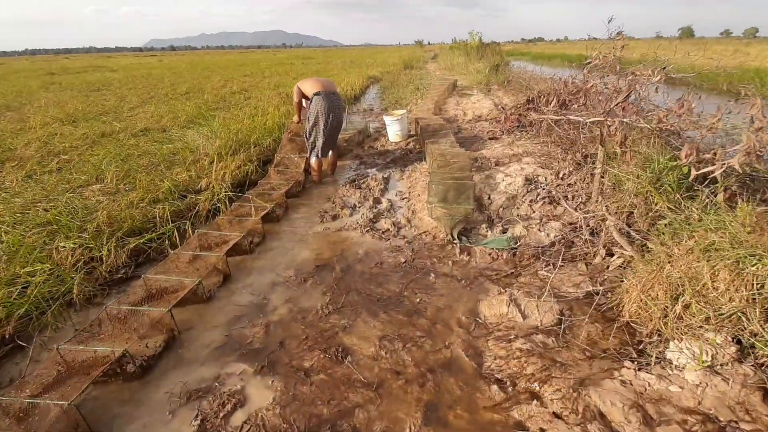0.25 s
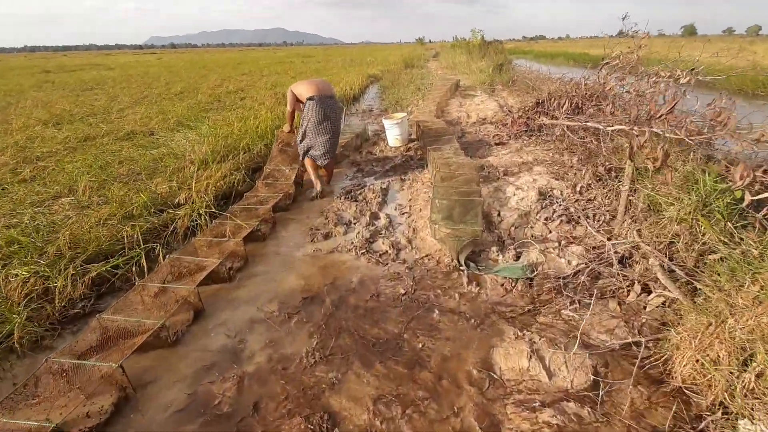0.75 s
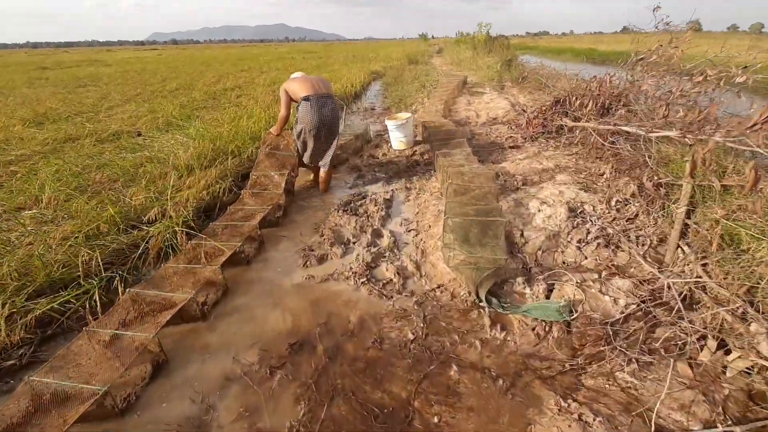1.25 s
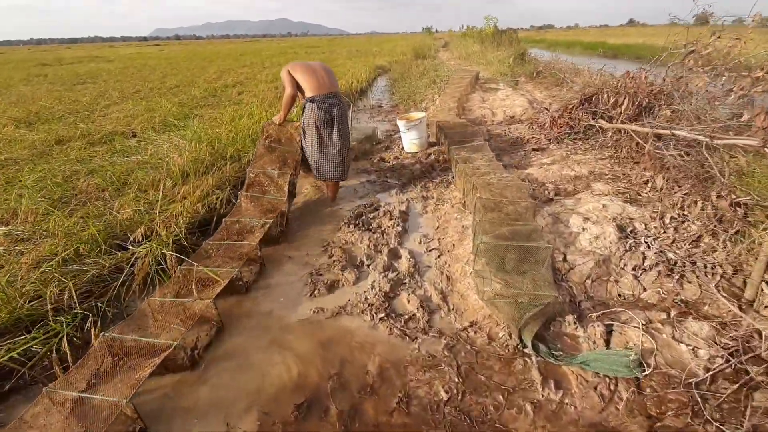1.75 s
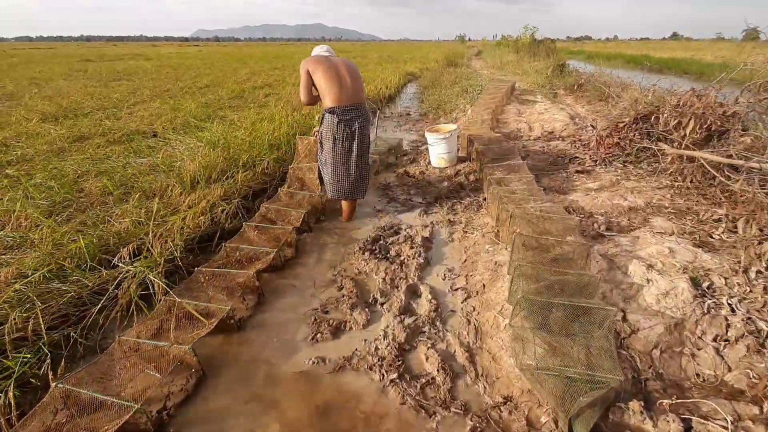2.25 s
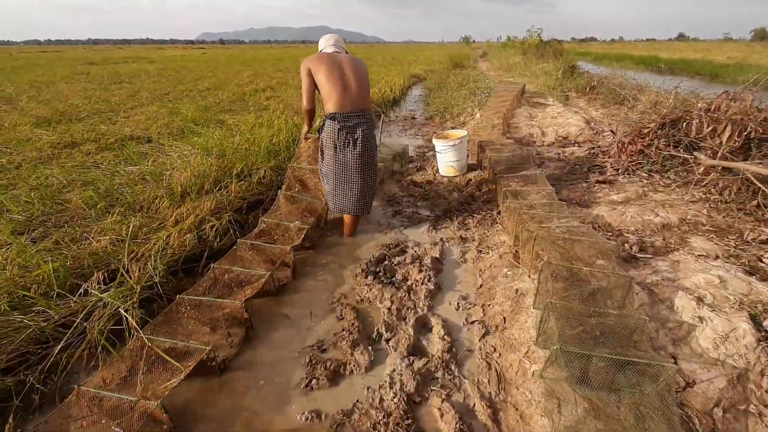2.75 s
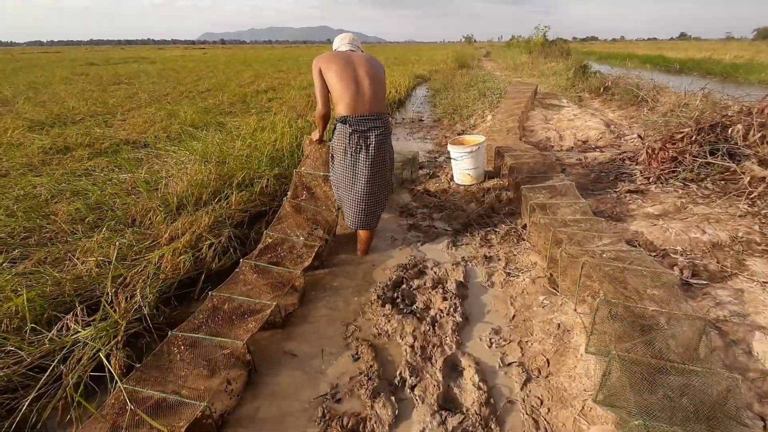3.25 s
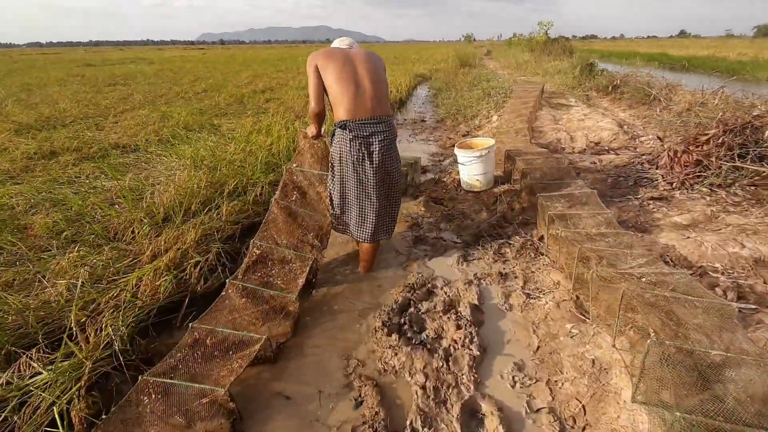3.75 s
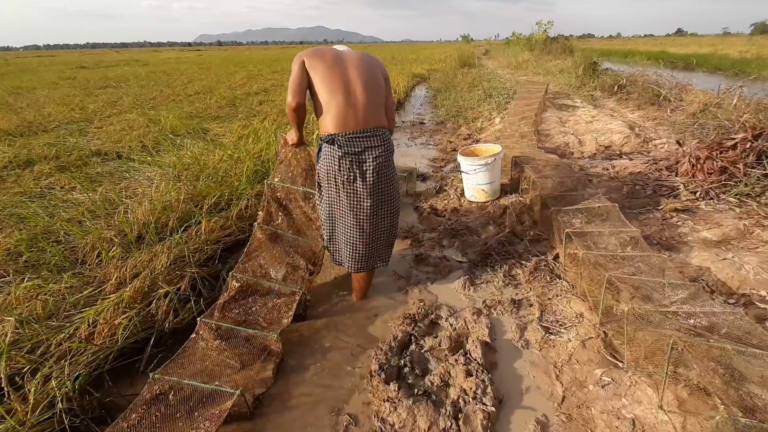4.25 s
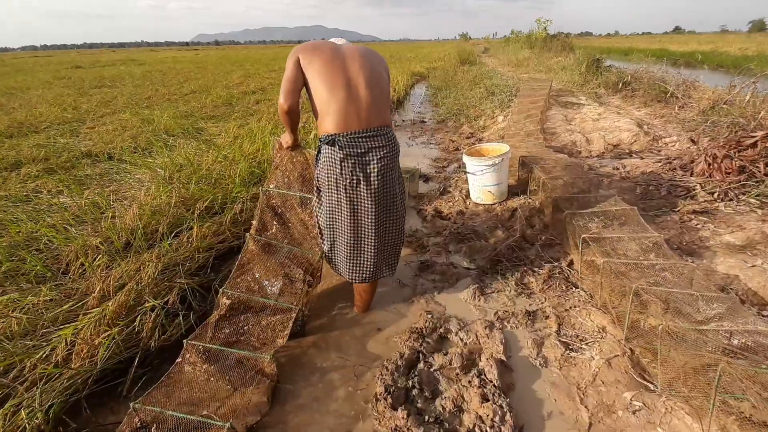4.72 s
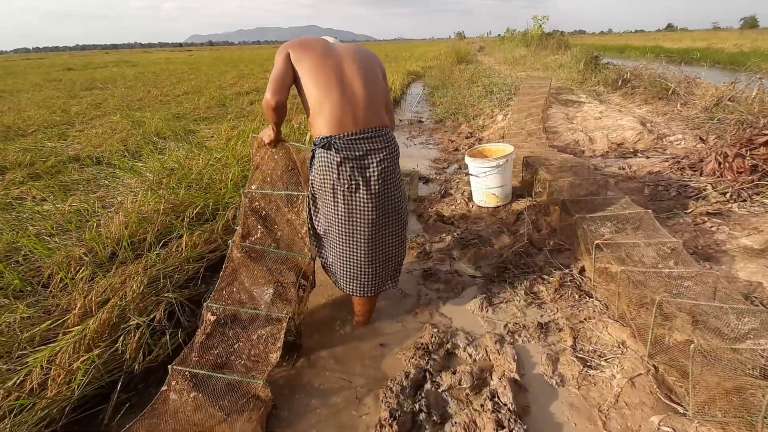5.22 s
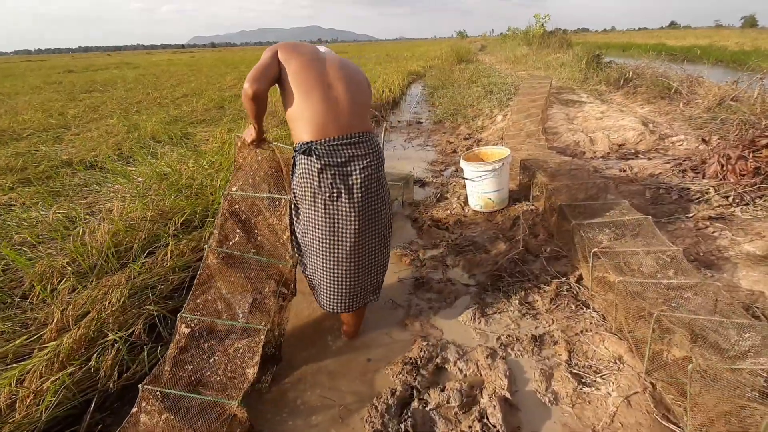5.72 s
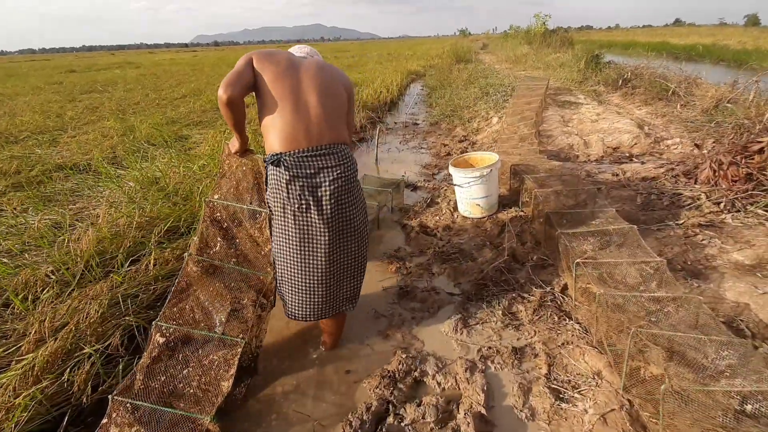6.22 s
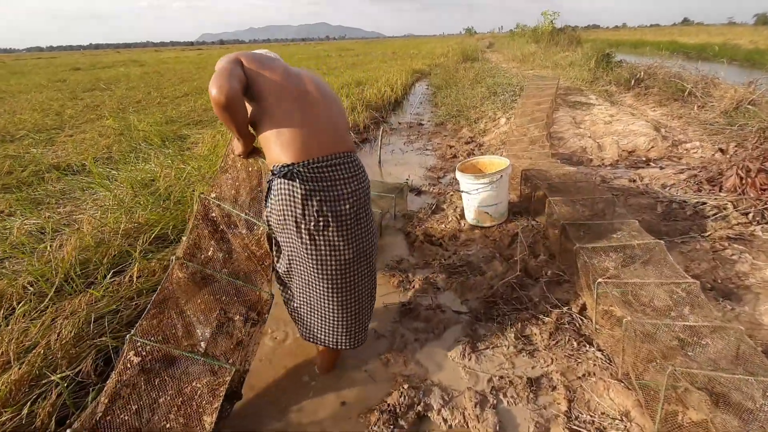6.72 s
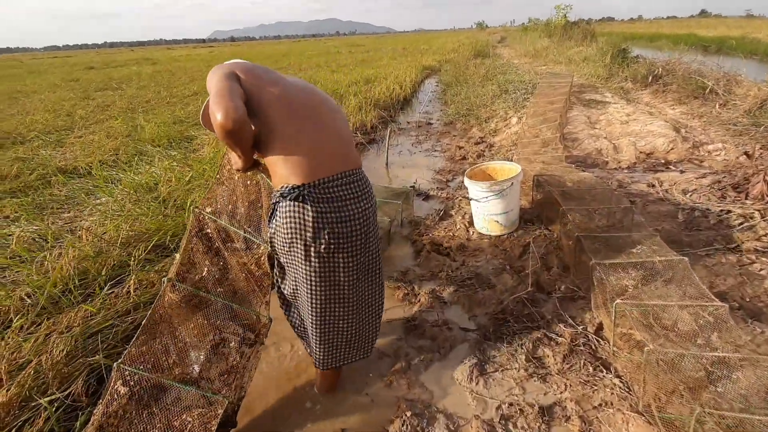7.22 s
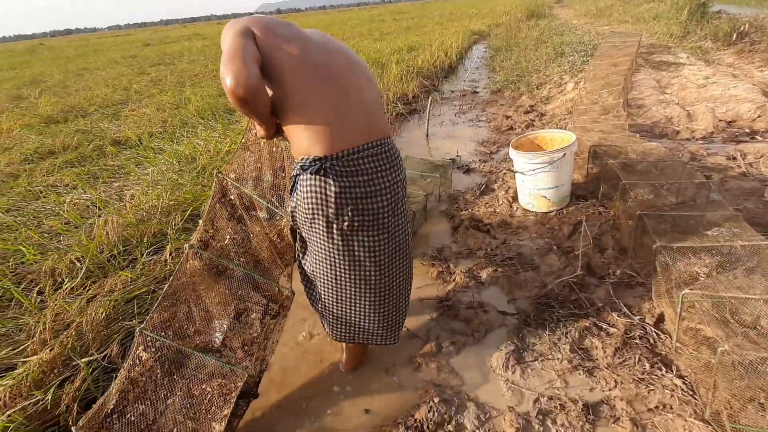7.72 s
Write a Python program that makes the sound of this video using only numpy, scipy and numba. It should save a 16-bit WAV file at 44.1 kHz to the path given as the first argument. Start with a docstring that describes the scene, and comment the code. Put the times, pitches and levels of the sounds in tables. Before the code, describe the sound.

Irregular watery sloshes, small slaps and bubbly plops from muddy wading, with low wind buffeting and a faint steady hiss beneath.

```python
"""In a shallow muddy ditch, feet wade a few metres from a small two-port camera held in a breeze.
Water sounds are damped bubble tones, patchy noise washes of gurgle, splash and spray, and short noise slaps.
Wind is low turbulence that buffets each port on its own: rumble, flutter and single thumps.
A faint hiss lies beneath; resonances of the case colour water and hiss, and a low-pass cuts the top."""
import sys
import numpy as np
from scipy import signal
from scipy.fft import rfft, irfft, next_fast_len
from scipy.io import wavfile
from scipy.ndimage import uniform_filter1d
from numba import njit

SR = 44100
rng = np.random.default_rng(int(sys.argv[2]) if len(sys.argv) > 2 else 0)


def wav_record(signal):
    """Record a signal, one row per channel, as 16-bit PCM in the file named by sys.argv[1]."""
    frames = np.transpose(np.atleast_2d(signal))
    bounded = np.clip(frames, -1, 1)
    # unit amplitude maps onto the largest positive 16-bit level
    quanta = np.round(bounded * 32767).astype(np.int16)
    wavfile.write(sys.argv[1], SR, quanta)


N = 351653

# relative spectrum of churned and slapped water: (frequency [Hz], level [dB])
WATER_SPECTRUM = [(300, 5), (550, -6), (1000, -4.5), (2000, 0), (4000, 2), (7500, -3.5), (8800, -13),
                  (10500, -6), (12600, -1), (15500, -4.5)]
LEAD = 4  # samples by which the left port hears the water first


def undb(db):
    """Decibel law: amplitude gain of a level in dB."""
    return 10 ** (np.asarray(db) / 20)


def level(x, db):
    """Mean-square energy: scale a signal to an rms level in dB."""
    return x * undb(db) / np.sqrt(np.mean(x ** 2))


def curves(table):
    """Linear interpolation: columns of a table joined by straight lines in time."""
    s, *columns = np.transpose(table)
    return [np.interp(np.arange(N) / SR, s, column) for column in columns]


def colour(x, points):
    """Spectral shaping: weight each frequency by (Hz, dB) points joined on a log-frequency axis."""
    point_hz, point_db = np.transpose(points)
    size = next_fast_len(N)
    hz = np.maximum(np.arange(size // 2 + 1) * SR / size, 1)
    gain = undb(np.interp(np.log(hz), np.log(point_hz), point_db))
    return irfft(rfft(x, size) * gain, size)[..., :N]


def band(x, lo_hz, hi_hz):
    """Band limitation: a Butterworth band-pass."""
    return signal.sosfilt(signal.butter(3, [lo_hz, hi_hz], "bandpass", fs=SR, output="sos"), x)


def walk(rate_hz):
    """Random modulation: levels held for 1 / rate_hz seconds and smoothed twice; spread near 1."""
    hold = int(SR / rate_hz)
    steps = np.repeat(rng.standard_normal(N // hold + 1), hold)
    return 1.21 * uniform_filter1d(uniform_filter1d(steps, hold), hold)[:N]


def heap(floor_db, crest, peak_db, rise_s, fall_s, edge_db, power):
    """Incoherent power sum: gain of a floor plus humps, edge_db under their crest at rise_s and fall_s."""
    t = np.arange(0, N, 64) / SR  # coarse grid, interpolated at the end
    hump_power = 0
    humps = np.broadcast(crest, peak_db, np.maximum(rise_s, .01), np.maximum(fall_s, .01))
    for at, db, rise, fall in humps:
        distance = np.abs(t - at) / np.where(t < at, rise, fall)
        hump_power = hump_power + undb(db - edge_db * distance ** power) ** 2
    return np.sqrt(np.interp(np.arange(N) / SR, t, hump_power) + undb(floor_db) ** 2)


@njit
def ring(n, s, hz, t60, rise, glide, left, right, lag):
    """Damped oscillation: tones swell over rise cycles and glide by a share; right lags by lag samples."""
    out = np.zeros((2, n + 20000))
    for g in range(len(s)):
        start = int(s[g] * SR)
        length = min(int(t60[g] * SR), 19000)
        fade = np.exp(-np.log(1000.) / (t60[g] * SR))  # 60 dB down after t60 seconds
        size, phase = 1., 0.
        for i in range(length):
            v = size * min(phase / (2 * np.pi * rise), 1.) * np.sin(phase)
            out[0, start + i] += left[g] * v
            out[1, start + i + int(lag[g])] += right[g] * v
            phase += 2 * np.pi * hz[g] * (1 + glide * i / length) / SR
            size *= fade
    return out[:, :n]


def eddies(spectrum, lo_hz, hi_hz, lump_db, lump_hz, bed_db, count):
    """Turbulence: brief eddies strike one port each, over a lumpy noise bed unrelated between ports."""
    u = rng.random((count, 5)).T
    hz = lo_hz * (hi_hz / lo_hz) ** u[1]
    size = undb(-3.0 * np.log(u[2] + 0.038)) * np.sign(u[3] - .5)  # either polarity
    at_left = u[4] < .5
    pulses = ring(N, u[0] * N / SR, hz, 5.2 / hz, 0.53, -0.14, size * at_left, size * ~at_left, 0 * hz)
    lumps = undb(lump_db * np.array([walk(lump_hz), walk(lump_hz)]))
    bed = colour(rng.standard_normal((2, N)) * lumps, spectrum)
    return level(level(band(pulses, 30.7, 640.0), 0) + level(bed, bed_db), 0)  # bed_db is relative to pulses


def thumps():
    """Vortex impact: single eddies thump the ports as damped low tones with random relative polarity."""
    # single eddies: (time [s], nominal peak [dB], pitch [Hz], left minus right [dB])
    thump_table = [(0.11, -36, 242, -1), (0.238, -36, 150, 5), (0.408, -37, 104, -2.5),
                   (0.845, -36, 88, -1), (0.922, -29, 99.6, 2.5), (1.002, -26, 202, -2),
                   (1.018, -30, 340, 0), (1.22, -24, 118, 2.5), (1.759, -34.5, 187, -19),
                   (1.862, -22, 152, 3), (1.895, -33, 380, 0), (1.921, -22, 149, -4), (2, -33, 91, 0.5),
                   (2.107, -25, 174, -10), (2.109, -27, 380, 0), (2.148, -25.5, 99.6, -2),
                   (2.356, -38, 380, -4), (2.39, -38, 400, -4), (2.856, -22, 161, 0), (2.892, -22, 231, -3),
                   (2.937, -27.5, 121, -6), (3.195, -36, 83, -5), (3.253, -39.5, 139, -7),
                   (3.797, -26, 116, 0.5), (3.859, -25.5, 141, 10), (3.888, -26, 147, 6),
                   (4.132, -38, 82.6, 6), (4.843, -36, 135, -3), (5.418, -21.5, 140, -2),
                   (5.446, -23, 117, 5), (5.49, -18, 220, 2), (5.856, -38, 103, -13.5),
                   (6.253, -36, 91.5, -11), (6.844, -34, 95, -16), (7.028, -36, 121, 11),
                   (7.506, -19, 138, 0), (7.706, -37, 108, -4), (7.844, -23, 243, -1),
                   (7.9, -25.5, 154, -2)]
    headroom_db = 6.5  # a thump has faded about this far by the time it crests
    s, peak_db, hz, side_db = np.transpose(thump_table)
    size = undb(peak_db + headroom_db)
    sign_draw, lag_draw = rng.random((len(s), 2)).T
    left = size * undb(side_db / 2)
    right = size * undb(-side_db / 2) * np.sign(sign_draw - .5)
    return band(ring(N, s, hz, 3.8 / hz, 0.38, -0.011, left, right, 60 * lag_draw), 49.0, 590.0)


def breeze():
    """Wind noise: local turbulence drives each port with rumble, quicker flutter and lone strong eddies."""
    # breeze between gusts: (time [s], rumble level [dB], flutter minus rumble [dB])
    calm_table = [(0.0, -51, -4.5), (0.26, -52, -1), (0.77, -58.5, -14), (0.86, -48, 1), (1.06, -41, 4.5),
                  (1.57, -51, -6), (2.11, -42, -1.5), (2.33, -45.5, -4.5), (3.24, -54, -8.5),
                  (3.93, -42.5, -14), (4.33, -61.5, -10.5), (5.26, -47.5, -9.5), (5.51, -45, 3),
                  (5.68, -51, -10.5), (6.88, -48, -18.5), (7.57, -58, -19), (7.79, -44.5, 1.5),
                  (7.97, -45.5, -0.5)]
    # gusts: (crest time [s], rumble level [dB], width [s], left minus right [dB], flutter minus rumble [dB])
    gust_table = [(0.129, -41.5, 0.07, -4.5, 1.5), (0.252, -41, 0.07, -2.5, 4),
                  (0.324, -46, 0.02, -20, -10), (0.424, -43, 0.12, -6.5, 1.5), (0.58, -48.5, 0.067, -1, -4),
                  (0.753, -57, 0.028, 13, -13), (0.937, -39, 0.037, 0, -8), (1.025, -38, 0.037, -5, 5.5),
                  (1.234, -31, 0.15, 0, -12), (1.329, -43.5, 0.058, -16, -2),
                  (1.526, -39.5, 0.092, -2, -11.5), (1.773, -43.5, 0.058, -5, 0.5),
                  (1.937, -36, 0.099, -3, -0.5), (2.014, -35, 0.034, -2, -15), (2.12, -34, 0.19, -1, 0),
                  (2.301, -51, 0.03, -4, -9), (2.397, -38.5, 0.08, -9, -4.5),
                  (2.478, -35.5, 0.029, -11, -23.5), (2.749, -34.5, 0.057, 1, -8.5),
                  (2.905, -35.5, 0.11, -1, -3.5), (3.142, -46, 0.046, 0, -9),
                  (3.209, -44.5, 0.038, -10, -15), (3.264, -42, 0.035, -5, -0.5),
                  (3.331, -48, 0.024, -12, -9), (3.392, -47.5, 0.074, -4, 1), (3.569, -40, 0.061, -2, 0.5),
                  (3.753, -41, 0.028, 1, -17), (3.868, -33, 0.13, -1, -3), (4.038, -39.5, 0.044, 10, -4.5),
                  (4.145, -44, 0.074, 4, -16), (4.395, -51, 0.067, -8, -8), (4.626, -43.5, 0.052, 1, -22),
                  (4.712, -41, 0.034, 6, -22), (4.786, -43, 0.12, -6, -7.5), (4.857, -38, 0.036, 5, -10),
                  (4.966, -45, 0.066, -6, -10), (5.166, -41, 0.12, -1, -6.5), (5.331, -33, 0.021, -1.5, -4),
                  (5.44, -34.5, 0.079, -1.5, 2), (5.633, -39, 0.15, -9, -11),
                  (5.881, -37.5, 0.063, -3, -13), (6.044, -34, 0.068, 0.5, -9.5),
                  (6.122, -47, 0.023, -8, -15), (6.186, -37.5, 0.091, -4, -10.5),
                  (6.329, -42, 0.035, -9.5, -15), (6.415, -37, 0.037, -2, -22),
                  (6.578, -35.5, 0.084, -4.5, -10), (6.653, -39.5, 0.043, -3.5, -8),
                  (6.859, -38, 0.24, 2, -10.5), (6.977, -53, 0.063, -4, -6), (7.041, -36.5, 0.03, 0, -12),
                  (7.088, -37.5, 0.096, -2, -13.5), (7.322, -50, 0.18, -12, -11),
                  (7.513, -36, 0.074, 0, -9), (7.902, -42, 0.042, -4, -5), (7.952, -41, 0.027, -14, -6)]
    # relative spectrum of slow turbulence: (frequency [Hz], level [dB])
    rumble_spectrum = [(15, -40), (30, -21), (55, -1.5), (100, 3), (170, -4.5), (300, -27), (700, -42)]
    # relative spectrum of quicker turbulence: (frequency [Hz], level [dB])
    flutter_spectrum = [(90, -49), (180, -1), (300, 0), (430, -3), (620, -21.5), (1000, -69)]
    edge_db = 19.5  # a gust is this much weaker one width before and after its crest
    roundness = 1.05  # 1 = pointed crest, higher = flatter top with steeper flanks
    calm_db, calm_flutter_db = curves(calm_table)
    crest, gust_db, width, pan_db, gust_flutter_db = np.transpose(gust_table)

    def blow(floor_db, peak_db):
        """Port gains: the gust level is split left and right by its pan."""
        return np.array([heap(floor_db, crest, peak_db + side * pan_db / 2, width, width, edge_db, roundness)
                         for side in (1, -1)])

    rumble = eddies(rumble_spectrum, 54.4, 164.0, 3.97, 30., 0.63, count=330)
    flutter = eddies(flutter_spectrum, 188.0, 473.0, 4.54, 40., 1.3, count=900)
    rumble = rumble * blow(calm_db, gust_db)
    flutter = flutter * blow(calm_db + calm_flutter_db, gust_db + gust_flutter_db)
    return rumble + flutter + thumps()


def hiss():
    """Stationary noise: a faint, steady, spectrally shaped hiss, unrelated at the two ports."""
    # relative spectrum of the hiss: (frequency [Hz], level [dB])
    hiss_spectrum = [(450, -45), (800, -36), (1300, -26), (2800, -7), (5300, -5.5), (7700, -4.5),
                     (10000, -5.5), (15500, -2)]
    return level(colour(rng.standard_normal((2, N)), hiss_spectrum), -61)  # dB rms before the case resonates


def spread(x, loose):
    """Partial coherence: the left port leads, and a share of the right port's power is unrelated."""
    loose = np.clip(loose, 0, 1)
    right = np.sqrt(1 - loose) * np.roll(x[0], LEAD) + np.sqrt(loose) * x[1]
    return np.array([x[0], right])


def swarm(lo_hz, hi_hz, cycles, scatter_db, wash_db, loose, patchy_db, patchy_hz, count):
    """Bubble resonance: many small bubbles of scattered size over a patchy wash too dense to resolve."""
    u = rng.random((count, 6)).T
    hz = lo_hz * (hi_hz / lo_hz) ** u[1]
    t60 = cycles * (0.15 + 3.82 * u[5]) / hz
    size = undb(-scatter_db * np.log(u[2] + 0.034))  # many small, few large, none huge
    pan = undb(10.7 * (u[3] - .5))
    lag = np.maximum(LEAD + 8.0 * (u[4] - .5) + .5, 0)  # the water lies over a range of directions
    bubbles = ring(N, u[0] * N / SR, hz, t60, 0.48, 0.518, size * pan, size / pan, lag)
    edges = np.geomspace(lo_hz, hi_hz, 5)
    wash = 0
    for low, high in zip(edges, edges[1:]):
        patches = undb(patchy_db * walk(patchy_hz))
        wash = wash + patches * band(spread(rng.standard_normal((2, N)), loose), low, high)
    mix = level(bubbles, 0) + level(wash, wash_db)  # wash_db is relative to the bubbles
    return level(colour(mix, WATER_SPECTRUM), 0)


def wading():
    """Bubble-cloud noise: low gurgle, splash and fine spray, stirred up by the same steps."""
    # stirred water between sloshes:
    # (time [s], splash level [dB], gurgle minus splash [dB], spray minus splash [dB]), before surge and balance
    lap_table = [(0, -63.5, -2.5, 0.5), (.55, -66.5, -5, 3), (.78, -68, -17, 0), (.95, -61.5, -5, -2),
                 (1.55, -63, 1, 7), (2.4, -86.5, 0, 13), (3.05, -61.5, -14, 3), (3.35, -59, -17, 2.5),
                 (4, -56.5, -14, 5), (4.22, -65, -15, 5.5), (4.7, -57.5, 1, 0.5), (4.9, -70, -20, 6.5),
                 (5.08, -64.5, 7.5, 3), (5.63, -53.5, -27, 0), (5.77, -77, -10, 16), (6.05, -61.5, 2, -1),
                 (6.73, -62.5, -13, -2.5), (7.2, -64, -13, 4.5), (7.6, -60.5, -7, -3), (7.97, -61, -9, 0)]
    # sloshes of churned water: (crest time [s], splash level [dB], swell [s], fade [s],
    # gurgle minus splash [dB], spray minus splash [dB]), before surge and balance
    slosh_table = [(0.235, -65, 0.087, 0.055, 9.5, -9), (0.89, -42, 0.075, .25, -10, -5.5),
                   (1.02, -48, .1, 0.26, 4, -3.5), (1.19, -39, .04, 0.055, 0, -7.5),
                   (1.26, -43, 0.092, 0.18, -1.5, -8.5), (1.375, -38, 0.15, 0.17, -4.5, -4),
                   (1.64, -49.5, .06, 0.085, -1, -17), (1.734, -41, 0.057, 0.13, -4, -2.5),
                   (1.92, -50.5, 0.054, 0.14, -6, 4.5), (1.984, -35, 0.09, 0.12, -12.5, -11),
                   (2.08, -37.5, 0.062, 0.092, -0.5, -8.5), (2.17, -42.5, 0.065, 0.19, -2, -0.5),
                   (2.29, -46.5, 0.074, 0.19, -6.5, 0.5), (2.62, -40.5, 0.2, .14, -3, -4),
                   (2.885, -43.5, 0.35, 0.13, -11.5, 1.5), (3.135, -53.5, .05, 0.16, -35.5, -16),
                   (3.47, -40.5, 0.055, 0.49, -9.5, -5.5), (3.58, -42, 0.28, 0.095, -13, -8),
                   (3.741, -33.5, 0.041, 0.043, -6, -7), (3.8, -42, 0.041, 0.24, -8, -7),
                   (3.93, -53, 0.13, 0.07, -0.5, -7), (4.058, -46, 0.1, 0.058, -21, -3),
                   (4.34, -45.5, 0.067, .1, -13, -2.5), (4.4, -40.5, 0.095, 0.11, -1.5, -4),
                   (4.56, -43, .04, 0.07, -14, -2.5), (4.62, -41.5, 0.11, 0.089, -9.5, -3),
                   (5.26, -55, 0.48, 0.22, -3.5, 0), (5.34, -43, 0.14, 0.16, -13, -5.5),
                   (5.401, -31.5, 0.026, 0.12, -4.5, -8.5), (5.51, -44, 0.12, 0.12, -3, -7),
                   (5.585, -42.5, 0.12, 0.14, -18, -4), (5.64, -50, 0.041, 0.052, -22, 4),
                   (5.94, -48, 0.15, 0.059, -11, -5.5), (6.21, -49, 0.036, 0.081, 10.5, -8),
                   (6.46, -39.5, 0.2, 0.11, -6.5, -3.5), (6.54, -41.5, .1, 0.1, -11.5, -5.5),
                   (6.89, -52, 0.086, 0.3, -5, -6), (7.01, -51.5, 0.12, 0.13, -20, -7),
                   (7.281, -28.5, 0.015, 0.033, -18.5, -5.5), (7.37, -45, .04, .05, 1.5, -6.5),
                   (7.455, -48, 0.093, 0.066, -7.5, -5), (7.55, -58, 0.021, 0.091, -16, 3.5),
                   (7.68, -56, 0.11, 0.079, -7, -22), (7.75, -47, 0.054, 0.057, -9, -5),
                   (7.92, -61.5, 0.11, 0.14, -20, 5)]
    swell_db = 20  # a slosh rises by this much over its swell and sinks by as much over its fade
    roundness = 0.87  # 1 = pointed crest, higher = flatter top with steeper flanks
    lap_db, lap_gurgle_db, lap_spray_db = curves(lap_table)
    crest, slosh_db, swell, fade, gurgle_db, spray_db = np.transpose(slosh_table)

    def stir(floor_db, peak_db):
        """Amplitude envelope: sloshes rise out of the lapping floor."""
        return heap(floor_db, crest, peak_db, swell, fade, swell_db, roundness)

    surge = undb(0.43 * walk(30) + 1.01 * walk(130))  # each slop of water lifts all bubble sizes together
    gurgle = swarm(492.4, 1084.0, 13.8, 0.77, -5.0, 0.42, 6.6, 35., count=900)
    splash = swarm(989.0, 4090.0, 23.5, 5.1, 1.0, 0.21, 4.8, 45., count=3600)
    spray = swarm(4140.0, 16660.0, 24.0, 3.3, 5.8, 1.0, 2.7, 60., count=5000)
    gurgle = gurgle * stir(lap_db + lap_gurgle_db, slosh_db + gurgle_db)
    splash = splash * stir(lap_db, slosh_db)
    spray = spray * stir(lap_db + lap_spray_db, slosh_db + spray_db)
    return surge * (gurgle + splash + spray)


def slaps():
    """Impact noise: a slap on the surface throws a burst that builds in a few ms and dies quickly."""
    # slaps: (time [s], spray drive before the envelope [dB], body minus spray [dB])
    slap_table = [(0.465, -35.5, -20), (0.816, -25.5, -17), (0.9343, -36, -8), (1.4237, -26, -17),
                  (1.6976, -35, -18), (1.9091, -29, -11), (1.955, -26, 2), (1.97, -32, 6),
                  (2.082, -28.5, -9), (2.151, -26, -10), (2.2295, -26.5, -7), (2.779, -37, -14),
                  (2.8304, -29, -13), (2.9582, -30, -23), (2.974, -31, -27), (3.09, -35, -4),
                  (3.731, -36.5, -2), (4.09, -31.5, -16), (4.548, -37.5, 5), (4.9637, -36, -25.5),
                  (5.038, -36, -12), (5.3586, -24, -5), (5.4, -35, 5), (5.589, -29.5, -3),
                  (5.6364, -25, -4), (6.212, -42, 3), (6.3195, -28.5, -17), (7.2754, -23.5, 5),
                  (7.356, -40, -14), (7.371, -25, -6), (7.446, -29.5, -8), (7.753, -37, 5),
                  (7.895, -39, -6)]
    rise_s, t60_s = 0.0047, 0.023
    body, mist = np.zeros((2, N))
    t = np.arange(3000) / SR
    burst = np.minimum(t / rise_s, 1) * np.exp(-np.log(1000) * t / t60_s)
    for s, db, body_db in slap_table:
        at = int(s * SR)
        mist[at:at + len(t)] += undb(db) * burst
        body[at:at + len(t)] += undb(db + body_db) * burst
    noise = colour(spread(rng.standard_normal((2, N)), 1.0), WATER_SPECTRUM) * undb(4.1 * walk(400))
    body_noise = level(band(noise, 900., 3700.0), 0)
    mist_noise = level(band(noise, 7600.0, .45 * SR), 0)
    return body * body_noise + mist * mist_noise


def plops():
    """Bubble resonance: each large bubble or droplet rings briefly and glides up in pitch."""
    # large bubbles and droplets: (time [s], tone amplitude before rise, fade and balance [dB], pitch [Hz])
    plop_table = [(0.818, -19.5, 6360), (0.864, -31, 1190), (0.895, -33, 1540), (0.947, -26, 1570),
                  (0.973, -32, 1510), (1.033, -29.5, 990), (1.054, -31.5, 3770), (1.111, -35.5, 2040),
                  (1.185, -25, 1430), (1.185, -27.5, 1980), (1.205, -23, 537), (1.231, -31.5, 1460),
                  (1.256, -28.5, 1600), (1.257, -27, 2300), (1.298, -32, 1510), (1.35, -28, 1500),
                  (1.366, -27, 2030), (1.369, -19, 985), (1.446, -29, 1950), (1.733, -28, 1440),
                  (1.748, -30, 1440), (1.924, -23, 4540), (1.956, -24, 3800), (1.97, -20, 3120),
                  (2.001, -16, 594), (2.042, -28, 1840), (2.054, -28, 1150), (2.086, -29, 2880),
                  (2.093, -26.5, 1520), (2.153, -23.5, 6500), (2.234, -30, 5060), (2.576, -32, 2730),
                  (2.611, -32, 2100), (2.636, -27, 2020), (2.885, -25.5, 3970), (2.959, -31, 5670),
                  (3.131, -32.5, 2580), (3.466, -20, 2650), (3.48, -22.5, 2400), (3.537, -27.5, 626),
                  (3.562, -25, 620), (3.732, -26, 1530), (3.745, -25, 5970), (3.785, -26, 1360),
                  (3.811, -29, 2280), (3.932, -28.5, 1426), (4.381, -25, 1670), (4.385, -26, 514),
                  (4.561, -34, 2720), (4.605, -30.5, 1230), (4.625, -26.5, 3600), (4.7, -34.5, 650),
                  (5.04, -42, 620), (5.066, -35.5, 4280), (5.19, -40, 520), (5.235, -40, 800),
                  (5.331, -21, 1230), (5.329, -27, 1870), (5.364, -25, 1740), (5.392, -21, 2170),
                  (5.396, -27, 775), (5.407, -25, 5250), (5.437, -38, 516), (5.461, -22.5, 3100),
                  (5.499, -25, 1650), (5.57, -20, 2780), (5.589, -30, 5200), (5.596, -24, 2020),
                  (5.627, -18, 4700), (5.636, -20, 3500), (5.64, -13, 4370), (5.908, -37.5, 2500),
                  (6.192, -35, 937), (6.213, -19, 720), (6.328, -40.5, 3160), (6.396, -28.5, 4260),
                  (6.432, -36, 1780), (6.44, -27.5, 550), (6.445, -32, 2240), (6.525, -29, 1410),
                  (6.869, -34, 1430), (6.898, -34, 2430), (6.966, -32, 3480), (7.276, -24, 3280),
                  (7.277, -22.5, 1530), (7.281, -23, 7150), (7.285, -22.5, 860), (7.308, -21.5, 940),
                  (7.357, -29, 900), (7.358, -28, 6030), (7.372, -20, 4030), (7.445, -25.5, 4800),
                  (7.342, -38, 880), (7.545, -34, 1980), (7.598, -31, 1540), (7.734, -38.5, 1070),
                  (7.751, -24, 4810), (7.915, -38, 2290)]
    s, size_db, hz = np.transpose(plop_table)
    size = undb(size_db)
    lag = np.maximum(LEAD + 3.9 * (rng.random(len(s)) - .5), 0)
    t60 = 0.019 * (hz / 1000) ** -0.5  # seconds; smaller, higher bubbles die sooner
    return ring(N, s, hz, t60, 1.56, 0.027, size, size, lag)


def case(air):
    """Cavity resonance: narrow peaks of the case add to the sound that reaches it."""
    # cavities of the case: (frequency [Hz], width [Hz], added resonance [dB])
    cavity_table = [(1496, 22.6, 2), (2052, 16, 0.5)]
    for hz, width, db in cavity_table:
        air = air + undb(db) * signal.lfilter(*signal.iirpeak(hz, hz / width, fs=SR), air)
    return air


def scene():
    """Superposition: water, louder at the right port, and hiss pass the case; wind acts at the ports."""
    water = (wading() + plops() + slaps()) * undb([[-.7], [.7]])
    return case(water + hiss()) + breeze()


def record(dry):
    """Low-pass filtering: the camera cuts the top above 15.6 kHz."""
    return signal.sosfilt(signal.ellip(10, .2, 60, 15600, fs=SR, output="sos"), dry)


dry = scene()
out = record(dry)
wav_record(out)
```